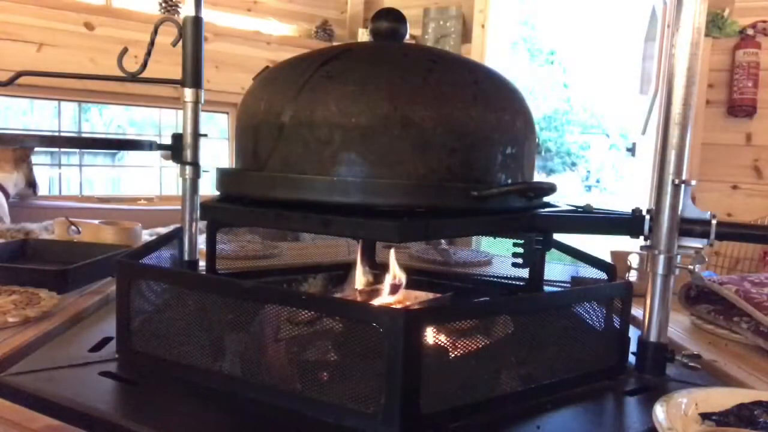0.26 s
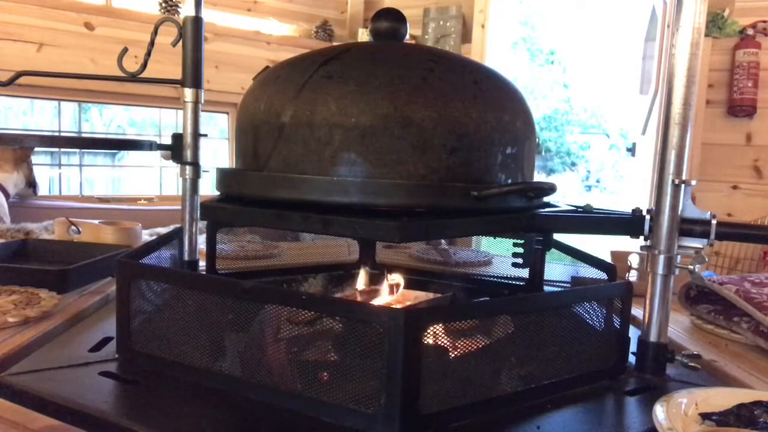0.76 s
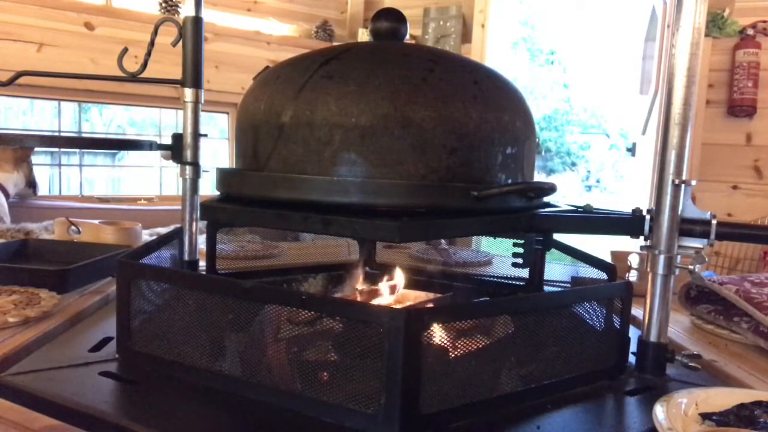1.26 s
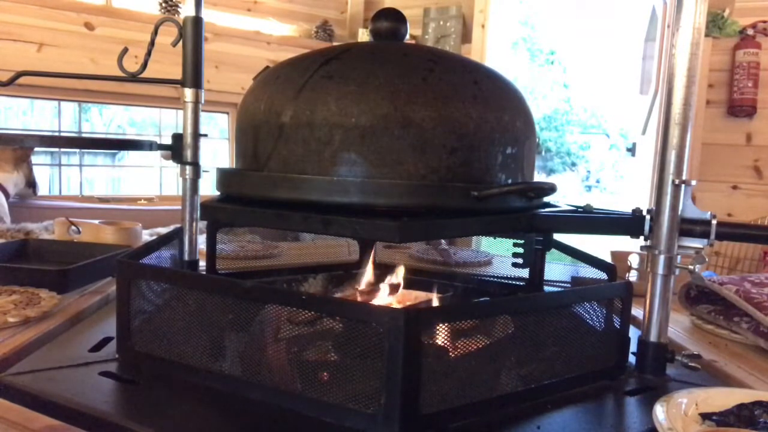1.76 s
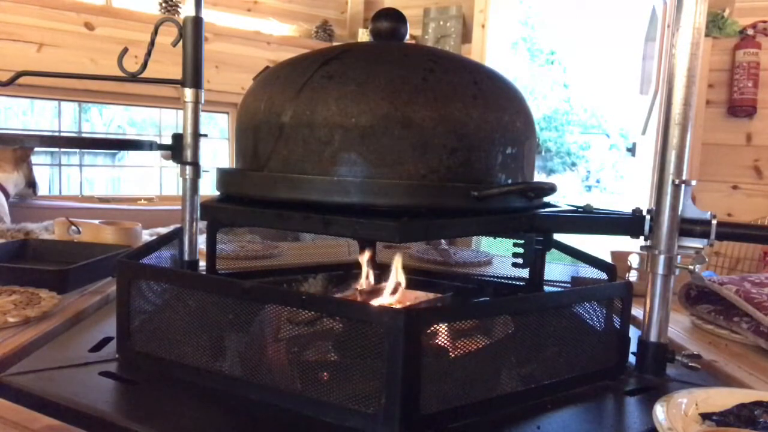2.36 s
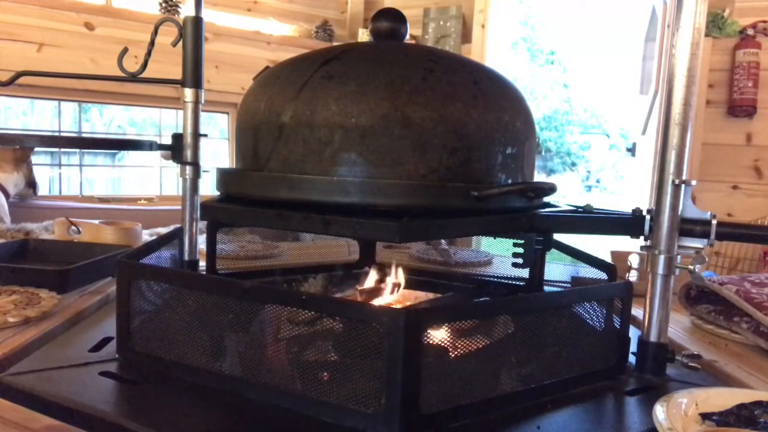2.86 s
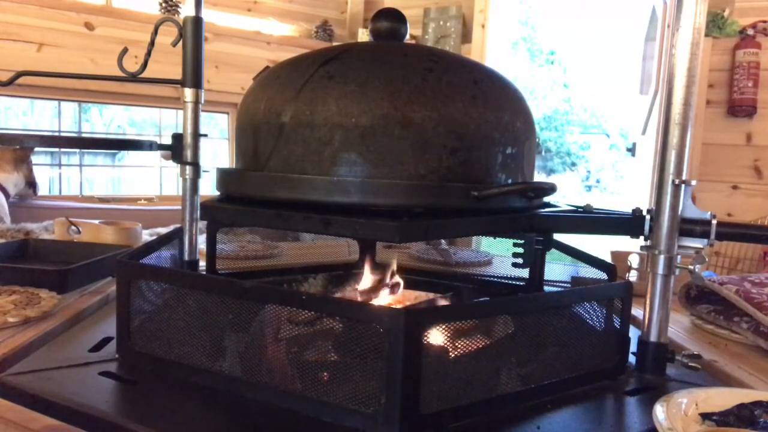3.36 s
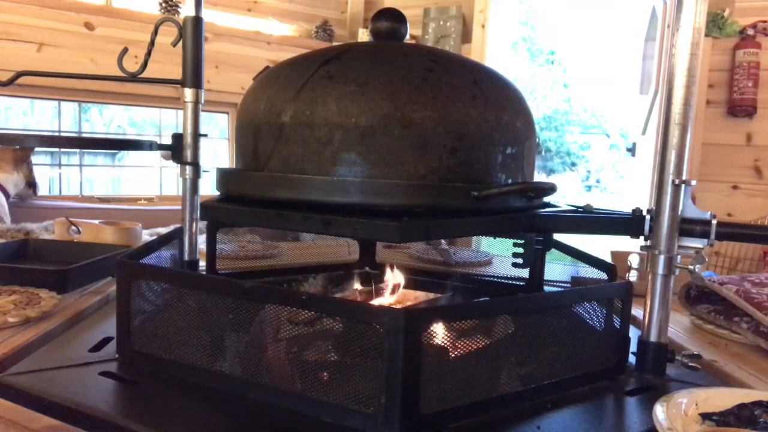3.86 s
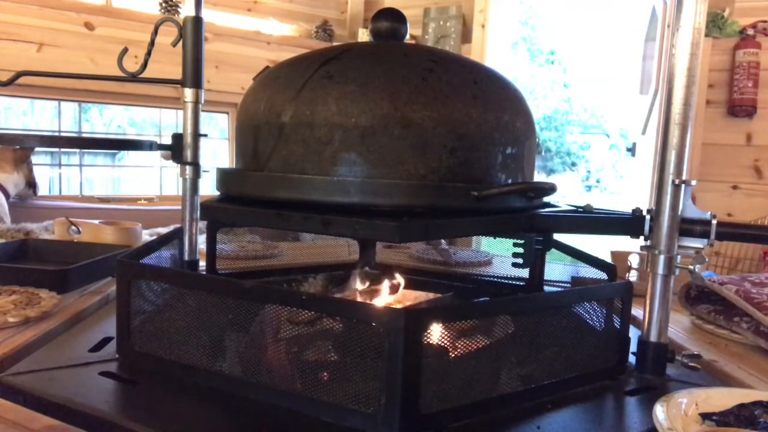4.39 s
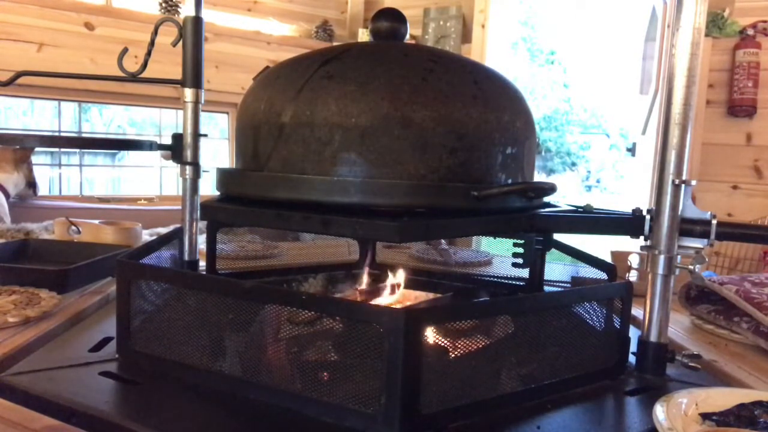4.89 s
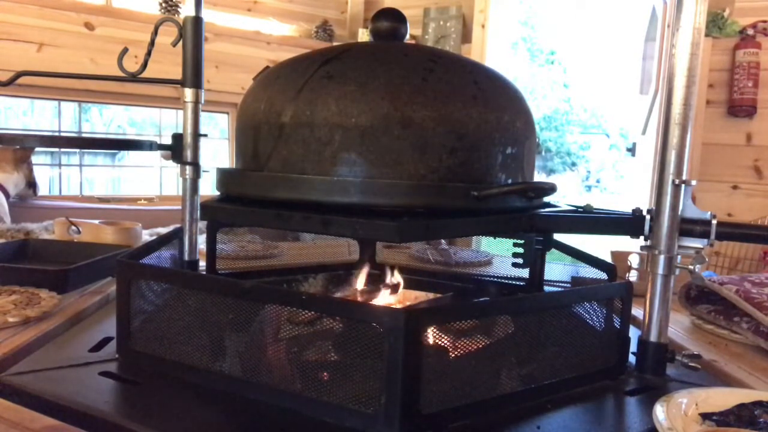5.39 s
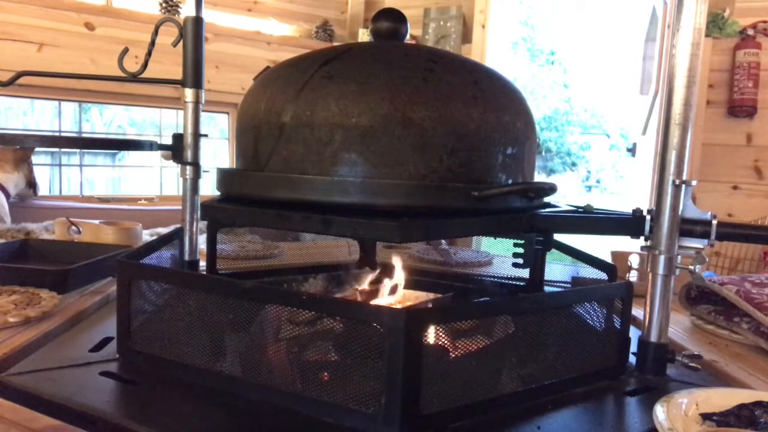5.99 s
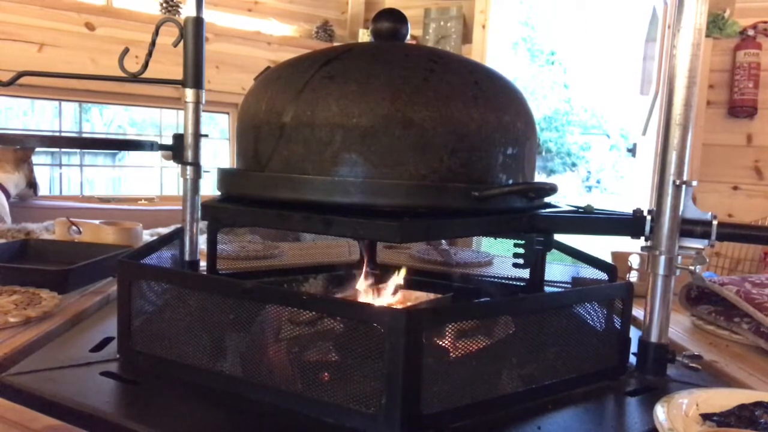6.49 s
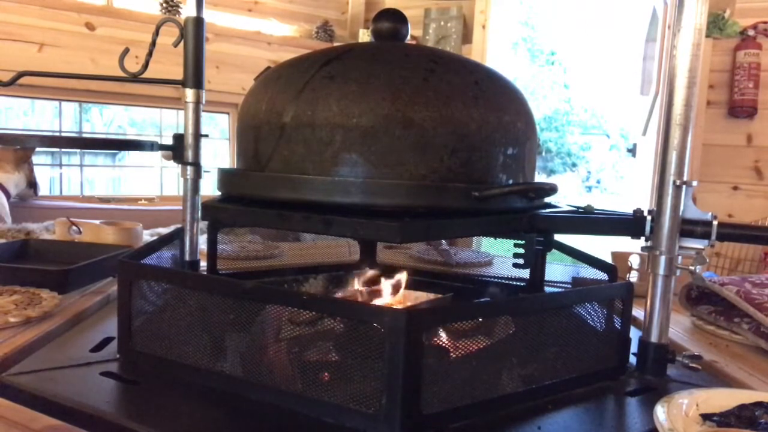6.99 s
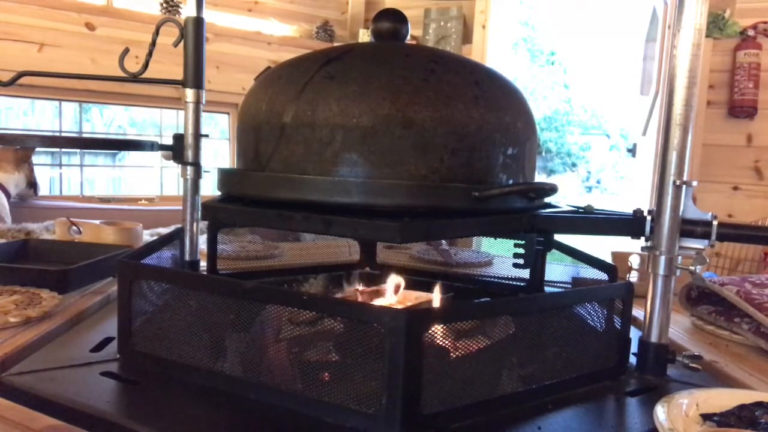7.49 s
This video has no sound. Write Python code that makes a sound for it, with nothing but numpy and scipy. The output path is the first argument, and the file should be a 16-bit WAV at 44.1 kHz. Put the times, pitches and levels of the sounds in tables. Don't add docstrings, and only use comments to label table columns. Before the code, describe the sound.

A fire's rush cuts off with a click, then food sizzles and pops in a wooden hut, with low thuds and one woody knock.

```python
import sys
import numpy as np
from scipy import signal
from scipy.fft import rfft, irfft, next_fast_len
from scipy.io import wavfile
from scipy.ndimage import uniform_filter1d, map_coordinates

SR = 44100
rng = np.random.default_rng(int(sys.argv[2]) if len(sys.argv) > 2 else 0)


def gain_from_db(level_db):
    decades = np.asarray(level_db, float) / 20
    return 10 ** decades


def transcribe(u):
    v = np.clip(np.atleast_2d(u).T, -1, 1)
    q = np.round(v * 32767).astype(np.int16)
    wavfile.write(sys.argv[1], SR, q)


N = 341583
T = np.arange(N) / SR
SWITCH_S = 0.508

# frequency in Hz, level in dB per Hz.
SIZZLE = [(1120, -67), (1900, -3.5), (2290, 6.5), (2510, 5), (3040, 6), (3660, -1), (4650, -9.5),
          (4830, -18), (6000, -12.5), (7800, -36), (13200, -120)]


def unit(x):
    return x / np.sqrt(np.mean(x ** 2) + 1e-20)


def along(points, hz):
    f, v = np.transpose(points)
    return np.interp(np.log(hz + 1), np.log(f + 1), v)


def filtered(x, response):
    m = next_fast_len(N + SR // 2)
    return irfft(rfft(x, m) * response(np.fft.rfftfreq(m, 1 / SR)), m)[:N]


def mode(f, centre_hz, width_hz):
    damping = 1j * f * width_hz
    return damping / (centre_hz ** 2 - f ** 2 + damping)


def rush(spectrum, patchy_db, size):
    z = signal.stft(rng.standard_normal(N + 512), nperseg=256)[2]
    field = uniform_filter1d(rng.standard_normal(z.shape), size[0], 0)
    field = uniform_filter1d(field, size[1], 1)
    noise = signal.istft(z * gain_from_db(patchy_db * unit(field)), nperseg=256)[1][:N]
    return unit(filtered(noise, lambda hz: gain_from_db(along(spectrum, hz))))


def narrow(hz, width_hz, steady):
    slow = filtered(rng.standard_normal(N), lambda f: 1 / (1 + (f / width_hz) ** 4))
    cycles = np.cumsum(hz + np.zeros(N)) / SR
    return unit((steady + unit(slow)) * np.sin(2 * np.pi * cycles))


def placed(times, shapes):
    at = np.round(np.asarray(times) * SR).astype(int)[:, None] + np.arange(shapes.shape[1])
    return np.bincount(at.ravel(), shapes.ravel(), N + shapes.shape[1])[:N]


def fading(t60, attack_s, size):
    t = np.arange(size) / SR
    decay = gain_from_db(-60 * t / np.reshape(np.abs(t60), (-1, 1)))
    return t, decay * (1 - np.exp(-t / attack_s))


def whistles(s, db, hz, length_s, rough, rise):
    t = np.arange(2500) / SR
    u = np.clip(t / length_s, 0, 1)
    swell = np.sin(np.pi * u ** 0.55)
    drift = rough * np.cumsum(rng.standard_normal((len(s), len(t))), axis=1)
    wobble = signal.fftconvolve(np.exp(1j * drift), np.hanning(24)[None] / 12, "same", axes=1)
    tone = np.real(wobble * np.exp(2j * np.pi * hz * t * (1 + rise * (u - 0.75))))
    return placed((s - 0.3 * length_s)[:, 0], gain_from_db(db) * swell * tone)


def swells_db(rows):
    return sum(db * np.exp(-((T - s) / width_s) ** 2) for s, db, width_s in rows)


def boil_db():
    # time in seconds, sizzle level in dB.
    boil_points = [(0, -55), (.34, -54), (.6, -53.5), (1.29, -52.5), (1.85, -50.5), (2.59, -51),
                   (2.89, -49), (3.23, -49), (3.6, -52), (4.46, -49.5), (4.75, -51), (5.03, -50.5),
                   (5.54, -50.5), (5.8, -53.5), (6.47, -53.5), (6.86, -53.5), (7.3, -54), (7.75, -50)]
    return np.interp(T, *np.transpose(boil_points))


def chance(count, over_db, pitch_hz, spread):
    draw = rng.standard_normal((count, 2))
    share = np.cumsum(gain_from_db(2 * boil_db()) * (T > SWITCH_S))
    s = np.interp(rng.uniform(0, 1, count), share / share[-1], T)
    db = np.interp(s, T, boil_db()) + over_db + 1.5 * draw[:, 0]
    return np.c_[s, db, pitch_hz * np.exp(spread * draw[:, 1])]


def dome(x, direct):
    # frequency in Hz, width in Hz, level in dB.
    dome_modes = [(1640, 78, 1), (2280, 68, -4), (3160, 1250, -8), (4720, 450, -14), (5260, 150, 2),
                  (5700, 140, -48), (6100, 160, -35)]
    return filtered(x, lambda f: direct + sum(gain_from_db(db) * mode(f, c, w) for c, w, db in dome_modes))


def hut(x):
    # frequency in Hz, decay time t60 in seconds.
    wall_t60 = [(300, 0.19), (2500, 0.2), (8000, 0.23), (15000, 0.017)]
    wet, step = np.zeros(N + SR), SR // 4
    for start in range(0, N, step):
        hz, t, z = signal.stft(rng.standard_normal(SR // 4), SR, nperseg=128)
        decay = gain_from_db(-60 * t / along(wall_t60, hz)[:, None])
        tail = signal.istft(z * decay, SR, nperseg=128)[1]
        answer = signal.fftconvolve(x[start:start + step], tail / np.linalg.norm(tail))
        wet[start + 90:][:len(answer)] += answer
    return wet[:N]


def hearth(x):
    rings_hz = [1324, 1470, 1640, 1885, 2271, 2954, 3494, 3800, 4228, 4613, 5182, 5726]
    return filtered(x, lambda f: 1 + gain_from_db(-8.5) * sum(mode(f, c, width_hz=25) for c in rings_hz))


def switching():
    # frequency in Hz, level in dB per Hz.
    open_fire = [(53, -36), (90, -3), (151, -20), (255, -1.5), (472, -5.5), (595, -3), (1260, 1.5),
                 (1470, -3.5), (2430, 1.5), (9000, -21), (11700, -53), (19800, -120)]
    before = gain_from_db(-53.0) * rush(open_fire, patchy_db=0.5, size=(4, 9)) * (T < SWITCH_S)
    t, shape = fading([0.02], 0.0001, size=1500)
    cycles = 60 * t + 2.2 * (1 - np.exp(-np.sqrt(t / 0.003)))
    click = gain_from_db(-30) * shape * np.sin(2 * np.pi * cycles + np.pi)
    return before + placed([SWITCH_S + 0.001], click)


def draught():
    # frequency in Hz, level in dB per Hz.
    air_colour = [(12, -53), (20, -37), (52, -1), (75, -3), (188, -2.5), (274, 0), (520, -3.5), (698, -1),
                  (770, -13), (1000, -10), (1300, -52), (2200, -120)]
    # time in seconds, level in dB.
    air_db = [
        (0, -71),
        (.37, -67),
        (.73, -73),
        (1.29, -69),
        (2.2, -70),
        (3.86, -72.5),
        (6, -70.5),
        (6.5, -69.5),
        (7.18, -69.5),
        (7.75, -67),
    ]
    gain = gain_from_db(np.interp(T, *np.transpose(air_db)))
    return gain_from_db(3) * gain * rush(air_colour, patchy_db=2.0, size=(2, 14))


def flue():
    # time in seconds, pitch in Hz, level in dB.
    column = [(0, 615, -81), (.37, 620, -69), (.56, 616.5, -83), (1.291, 610, -69), (1.621, 700, -71.5),
              (2.48, 701.4, -77.5), (3.86, 695, -73), (4.98, 691, -73.5), (5.45, 691, -78),
              (5.56, 702, -63.5), (5.75, 691, -76), (6.248, 689, -89), (6.698, 604, -69.5),
              (7.18, 605, -74.5), (7.75, 614, -66)]
    s, hz, db = np.transpose(column)
    return gain_from_db(np.interp(T, s, db)) * narrow(np.interp(T, s, hz), width_hz=41, steady=0)


def frying():
    swing_db = boil_db() - boil_db().mean()
    knots = rng.standard_normal(600)
    flutter = gain_from_db(1.1 * map_coordinates(knots, [T * 70]) * (T > SWITCH_S))
    return sizzling() * unit(flutter) + seething(swing_db) + fizzing(swing_db) * np.sqrt(flutter)


def bubbles(count, pitch_hz, spread, cycles, scatter_db):
    draw = rng.standard_normal((count, 3))
    clumps = rng.uniform(0, N / SR, count // 6)
    times = np.abs(clumps[np.arange(count) % len(clumps)] + 0.011 * draw[:, 0]) % (N / SR)
    hz = np.clip(pitch_hz * np.exp(spread * draw[:, 1:2]), 500, 14000)
    t, shape = fading(cycles / hz, 0.00012, size=400)
    size = gain_from_db(scatter_db * np.abs(draw[:, 2:]))
    return unit(placed(times, size * shape * np.sin(2 * np.pi * hz * t * (1 + 6 * t))))


def sizzling():
    near = bubbles(count=6000, pitch_hz=2920, spread=0.23, cycles=17.7, scatter_db=5.5)
    near = unit(dome(near + gain_from_db(-3.5) * hut(near), direct=0.5))
    steam = rush(SIZZLE, patchy_db=2.0, size=(4, 9))
    return gain_from_db(boil_db()) * (gain_from_db(-4.0) * near + gain_from_db(-2.0) * steam)


def seething(swing_db):
    # frequency in Hz, level in dB per Hz.
    simmer_colour = [(470, -36), (800, -9), (1140, -13.5), (1250, -11.5), (1290, -6), (1620, -3.5),
                     (1780, -15), (2000, -14.5), (2600, -30), (4400, -120)]
    # time in seconds, rise in dB, width in seconds.
    seethe_rows = [
        (1.749, 3.5, .06),
        (2.0, 1, 0.036),
        (3.04, 2, 0.046),
        (5.45, 1, 0.082),
        (6.59, 0.5, .04),
    ]
    before_db, overshoot_db, recover_s = 2.5, -8, 0.67
    dip_db = overshoot_db * np.exp(-((T - SWITCH_S) / recover_s) ** 2)
    gate_db = np.where(T < SWITCH_S, before_db, dip_db)
    gain = gain_from_db(-64 + 0.2 * swing_db + gate_db + swells_db(seethe_rows))
    large = bubbles(count=900, pitch_hz=1567, spread=0.19, cycles=50, scatter_db=5.5)
    large = unit(large + gain_from_db(-0.5) * hut(large))
    murmur = rush(simmer_colour, patchy_db=3.0, size=(3, 9))
    return gain * (gain_from_db(-6.0) * large + gain_from_db(-1.5) * murmur)


def fizzing(swing_db):
    # frequency in Hz, level in dB per Hz.
    mist_colour = [(2650, -22.5), (4500, 0.5), (4880, -8.5), (5900, -5.5), (10000, -28.5), (13000, -64),
                   (22000, -120)]
    # time in seconds, rise in dB, width in seconds.
    surge_rows = [
        (1.45, 3.5, 0.48),
        (2.33, 1.5, 0.058),
        (2.82, 3.5, 0.19),
        (3.3, 2.5, 0.19),
        (4, 2, 0.071),
        (5, 3, 0.12),
        (7.75, 3, .15),
    ]
    back_s = 1.27
    dip = gain_from_db(-3.5 / (1 + np.exp((T - back_s) / 0.042)) * (T > SWITCH_S))
    gain = dip * gain_from_db(-63.5 + 0.26 * swing_db + swells_db(surge_rows))
    fine = bubbles(count=3600, pitch_hz=5264, spread=0.25, cycles=54, scatter_db=5.5)
    fine = unit(fine + gain_from_db(-1.5) * hut(fine))
    mist = rush(mist_colour, patchy_db=3.0, size=(8, 9))
    return gain * (gain_from_db(-3) * fine + gain_from_db(-3.5) * mist)


def boards():
    # frequency in Hz, width in Hz.
    floor_modes = [(74, 27), (127, 46)]
    creep_db = [-75.5, -79.5]
    # time in
    # seconds, low mode in dB, high mode in dB.
    thud_rows = [(.17, -73, -76), (.52, -64, -63.5), (.77, -67, -72), (0.861, -65, -74), (.97, -62, -67.5),
                 (1.36, -55, -62.5), (1.5, -61, -70), (1.92, -83, -72.5), (3.73, -67, -86),
                 (5.169, -66, -74), (5.555, -53, -56), (5.69, -59, -72), (5.82, -56.5, -57.5),
                 (6.04, -53, -63), (6.155, -51.5, -59.5), (6.34, -71, -80), (6.58, -61.5, -83),
                 (6.77, -56, -65), (6.97, -50.5, -51), (7.005, -47.5, -56), (7.18, -67, -71),
                 (7.74, -61.5, -66.5)]
    load_s, settle_s, linger_s = 0.03, 0.044, 0.24
    s, *modes_db = np.transpose(thud_rows)[..., None]
    coarse = T[::64]
    late = coarse - s
    load = np.exp(-(late / np.where(late < 0, load_s, settle_s)) ** 2)
    stir = gain_from_db(-17.5) * np.exp(-(late / linger_s) ** 2)
    total = 0
    for db, idle_db, (hz, width_hz) in zip(modes_db, creep_db, floor_modes):
        thud = np.interp(T, coarse, np.sum(gain_from_db(db) * load, axis=0))
        creep = gain_from_db(idle_db) + np.interp(T, coarse, np.max(gain_from_db(db) * stir, axis=0))
        total = total + thud * narrow(hz, width_hz, steady=3.5) + creep * narrow(hz, width_hz, steady=0)
    return total


def jets():
    # time in seconds, level in dB, centre in Hz, length in seconds.
    jet_rows = [(0.608, -51, 3185, 0.017), (0.693, -58, 2800, 0.017), (0.772, -67, 8700, 0.018),
                (0.798, -65, 9500, 0.011), (0.936, -61.5, 8200, 0.012), (1.06, -67, 9300, 0.036),
                (1.277, -65.5, 8800, 0.023), (1.46, -61, 5800, 0.019), (2.002, -68, 8840, 0.062),
                (2.324, -55, 5000, .03), (3.04, -54, 5900, 0.017), (3.38, -54, 5900, 0.0097),
                (4, -65, 7760, 0.031), (4.503, -58, 6140, 0.011), (6.2005, -56, 8950, 0.0044),
                (7.64, -51, 4460, 0.029), (2.003, -46.5, 3870, .018), (2.206, -71, 11800, .05),
                (2.865, -48.5, 4080, 0.022), (3.205, -50.5, 5600, 0.01), (3.957, -67, 4500, 0.012),
                (5.621, -55, 4220, 0.063), (6.344, -58.5, 5970, 0.034), (6.649, -53, 5440, 0.013),
                (6.799, -51.5, 4090, 0.027), (7.256, -51, 4180, 0.013), (1.562, -56.5, 4550, .03),
                (1.638, -57, 4580, .03), (2.36, -52, 4680, .02), (2.383, -62, 5200, .015),
                (2.506, -52, 4500, 0.011), (2.237, -61, 4360, 0.023), (2.783, -61.5, 6600, .03),
                (3.214, -53, 7600, .012), (3.057, -60, 5480, 0.054), (7.181, -53, 4430, .012),
                (4.252, -57, 6400, .015), (4.327, -61, 5900, .012), (4.478, -54, 4950, 0.0097),
                (5.0, -54, 4620, 0.017), (4.83, -64, 6100, 0.031)]
    s, db, hz, length_s = np.transpose(jet_rows)[..., None]
    return whistles(s, db + 3.5, hz, length_s, rough=0.338, rise=0)


def spits():
    # time in seconds,
    # level in dB, pitch in Hz.
    spit_rows = [(0.749, -50.5, 2480), (1.262, -47.5, 2460), (1.642, -48, 2420), (1.726, -47, 3430),
                 (1.738, -48, 2220), (1.853, -46.5, 3290), (1.989, -52.5, 2440), (2.061, -48, 2680),
                 (2.198, -49, 3150), (2.236, -44, 3090), (2.314, -46.5, 3060), (2.371, -47, 3050),
                 (2.867, -62, 3000), (3.002, -47, 2794), (3.949, -49, 2580), (4.233, -45, 2935),
                 (4.25, -46.5, 3080), (4.284, -47, 2920), (4.308, -44.5, 3120), (4.371, -48.5, 2730),
                 (4.635, -48, 2770), (4.666, -47, 3070), (4.71, -46.5, 2780), (5.166, -46, 2990),
                 (5.178, -46, 2723), (.69, -53, 2930), (2.921, -49.5, 2810), (2.961, -50, 3120),
                 (4.335, -50, 3200), (4.48, -49, 2600), (4.52, -58, 2990), (5.04, -49, 2575),
                 (5.28, -51, 2800), (2.44, -51, 3090), (5.599, -48, 2270), (5.665, -46.5, 2280),
                 (6.181, -52, 2230), (6.206, -47.5, 2860), (7.555, -62.5, 2400), (7.7, -55, 2640),
                 (1.16, -55, 1460), (1.595, -55, 2310), (1.703, -56, 1800), (1.773, -49.5, 2010),
                   (1.992, -48.5, 1628), (3.026, -52.5, 1640), (3.053, -51, 2160), (3.69, -53, 1750),
                   (4.121, -50.5, 1880), (4.609, -49.5, 2200), (5.003, -52, 2270), (5.516, -51, 2205),
                   (5.927, -51.5, 2324), (6.769, -51, 2280), (6.873, -56, 1630), (1.739, -61, 1400),
                   (1.79, -57, 1690), (1.721, -64, 1330), (5.282, -61, 1493), (5.425, -59, 1450),
                   (5.44, -56, 1610), (5.52, -56, 1433), (5.659, -60, 1670), (6.595, -55, 1633),
                   (6.566, -62, 1540), (3.42, -64, 1480)]
    small = chance(count=10, over_db=-2.5, pitch_hz=2850, spread=0.11)
    s, db, hz = np.transpose([*spit_rows, *small])[..., None]
    ring = whistles(s, db + 4, hz, length_s=0.018, rough=0.17, rise=0.039)
    t, shape = fading([0.035], 0.0012, size=1200)
    drops = rng.standard_normal((len(s), len(t))) ** 3 / 4
    splash = placed(s[:, 0] - 0.004, gain_from_db(db + 9.5) * shape * drops)
    return ring + filtered(splash, lambda f: gain_from_db(0.75 * along(SIZZLE, f)))


def snaps():
    # time in seconds, peak in dB, pitch in Hz.
    snap_rows = [(0.8831, -30.5, 2520), (1.4004, -36, 2580), (1.5943, -34, 2330), (1.6385, -32, 2690),
                 (1.7015, -34, 2300), (1.7665, -32, 2500), (1.8647, -35, 2760), (1.988, -31.5, 2500),
                 (2.0776, -35, 2390), (2.1853, -39, 2910), (2.8417, -37, 2950), (2.8651, -28, 3010),
                 (3.0462, -35, 3420), (3.1599, -34, 2350), (3.2023, -32, 2710), (3.21, -39, 3900),
                 (3.8233, -29, 2430), (3.9539, -32, 4650), (4.1109, -33, 2990), (4.4087, -35, 2970),
                 (4.4948, -32, 2710), (4.5663, -31, 3100), (5.1246, -31, 2970), (5.6016, -34, 2350),
                 (6.1296, -35, 2560), (6.2065, -28, 2780), (6.9486, -33, 2540), (6.9807, -38, 4200),
                 (7.5561, -32, 2480), (7.7199, -33, 2450)]
    faint = chance(count=70, over_db=12, pitch_hz=2850, spread=0.086)
    s, db, hz = np.transpose([*snap_rows, *faint])[..., None]
    t, shape = fading([0.0055], 0.00008, size=400)
    cycles = placed(s[:, 0], gain_from_db(db + 3) * shape * np.sin(2 * np.pi * hz * t))
    return filtered(cycles, lambda f: (1j * f / (900 + 1j * f)) ** 2)


def blips():
    # time in seconds, peak in dB, pitch in Hz.
    blip_rows = [(0.9243, -41, 2660), (0.9544, -42, 2980), (1.5507, -39.5, 2770), (1.564, -42, 2350),
                 (1.6587, -42, 3140), (1.8342, -44, 2270), (1.8906, -45, 2900), (2.142, -39, 2810),
                 (2.154, -43, 2920), (2.2844, -38, 3120), (2.4075, -44, 3770), (2.4224, -40, 3330),
                 (2.5042, -40, 2950), (2.574, -36.5, 3100), (2.6419, -41, 2700), (2.719, -40, 3280),
                 (3.175, -40, 2840), (3.2405, -44, 2620), (3.266, -38, 2960), (3.454, -41.5, 2280),
                 (3.575, -39.5, 2910), (3.7718, -40, 2940), (4.0356, -38.5, 3090), (4.1577, -39, 3000),
                 (4.4328, -36, 3006), (4.5418, -40, 2370), (4.7523, -39, 3100), (4.9104, -39, 2270),
                 (5.3494, -44, 2300), (6.0252, -43, 2280), (7.5044, -45, 2270), (7.6257, -40, 3950),
                 (7.6474, -41, 3100), (7.6905, -38, 2300), (7.7078, -40.5, 3094)]
    s, db, hz = np.transpose(blip_rows)[..., None]
    return whistles(s + 0.001975, db - 3, hz, length_s=0.0059, rough=0.062, rise=0.086)


def cracks():
    # time in seconds, peak in dB, tail t60 in seconds.
    crack_rows = [
        (1.7679, -50, 0.03),
        (2.8414, -63, 0.03),
        (3.2023, -56, .015),
        (6.9805, -62, .015),
        (3.21, -39, 0.056),
        (3.221, -52, 0.066),
        (5.162, -60, .03),
        (6.1279, -43, 0.049),
        (7.7169, -45, 0.033),
    ]
    sparks = chance(count=14, over_db=-13, pitch_hz=0.92, spread=0.3) * [1, 1, 0.015]
    s, db, t60 = np.transpose([*crack_rows, *sparks])
    t, spray = fading(t60, 0.0003, size=3000)
    snap = 4.5 * gain_from_db(-60 * t / 0.00095)
    burst = placed(s, gain_from_db(db[:, None] - 7.5) * (spray + snap) * rng.standard_normal(spray.shape))
    return filtered(burst, lambda f: 1j * f / (2500 + 1j * f) / (1 + 1j * f / 11000))


def knocks():
    # time in seconds, peak in dB, hollow pitch in Hz, plank level in dB.
    knock_rows = [(3.8245, -52, 800, -64.5), (5.54, -49, 169.6, -72), (5.801, -55, 276, -70),
                  (6.129, -46, 178, -60.5), (6.4027, -32.5, 590, -45.5), (6.4084, -34.5, 760, -53),
                  (6.4118, -22, 565, -40), (6.4238, -29, 502, -57), (6.4345, -45, 670, -66),
                  (6.445, -43, 500, -70), (6.468, -56, 488, -70), (6.662, -50, 402, -62),
                  (6.672, -54, 594, -67)]
    # frequency in Hz, level in dB, t60 in seconds.
    plank_modes = [(225, -6.5, 0.23), (274, 3.5, 0.089), (458.3, 3, 0.19), (800, 15, 0.022),
                   (970, -13, 0.11)]
    s, db, hollow_hz, plank_db = np.transpose(knock_rows)[..., None]
    hz, level, t60 = np.transpose(plank_modes)
    t, shape = fading(t60, 0.0021, size=9000)
    plank = np.sum(gain_from_db(level[:, None]) * shape * np.sin(2 * np.pi * hz[:, None] * t), axis=0)
    puff = (t / 0.0028) ** 2 * np.exp(2 - 2 * t / 0.0028)
    hollow = puff * np.sin(2 * np.pi * hollow_hz * t)
    return placed(s[:, 0], gain_from_db(db) * hollow + gain_from_db(plank_db) * plank)


def bird():
    # time in seconds, peak in dB, upper voice in dB.
    tick_rows = [(3.8357, -61.5, -11), (3.8975, -62, -9), (4.075, -61, -7), (4.137, -62.5, -11),
                 (4.2941, -63, -9), (7.0803, -63, -1), (7.2713, -59.5, -5), (7.3292, -61, -5),
                 (7.4935, -64, -9), (7.557, -71, -6.5), (7.6924, -65, -7)]
    s, db, upper_db = np.transpose(tick_rows)
    t, shape = fading(np.full(len(s), 0.034), 0.0067, size=1500)
    lag = 0.0022 * (1 - np.exp(-t / 0.0022))
    low = np.sin(2 * np.pi * (7300 * t - 2400 * lag))
    high = gain_from_db(upper_db[:, None] - 60 * t / 0.18) * np.sin(2 * np.pi * (7980 * t + 250 * lag))
    return placed(s - 0.003, gain_from_db(db[:, None] + 18.0) * shape * (low + high))


def scene():
    hits = jets() + spits() + snaps() + blips() + cracks()
    ticks = bird()
    wet = gain_from_db(-8.0) * hut(hits + gain_from_db(4.5) * ticks)
    fire = gain_from_db(-0.67) * hearth(frying() + hits + wet)
    around = boards() + draught() + flue()
    return (switching() + fire + around + knocks() + ticks)[None]


def band_limit(x):
    return signal.sosfilt(signal.butter(12, 15725, fs=SR, output="sos"), x)


def record(dry):
    # frequency in Hz, level in dB per Hz.
    hiss_colour = [(4120, -11.5), (7000, -7), (9150, -8.5), (10300, -14), (11300, -11.5), (14900, -18),
                   (15600, -17.5)]
    hiss = gain_from_db(-71.5) * rush(hiss_colour, patchy_db=2.5, size=(2, 2))
    hiss = hiss * gain_from_db(1.8 * (T > 6.75))
    heard = filtered(dry[0] + hiss, lambda f: f < 15725)[None]
    return band_limit(heard)


dry = scene()
out = record(dry)
transcribe(out)
```